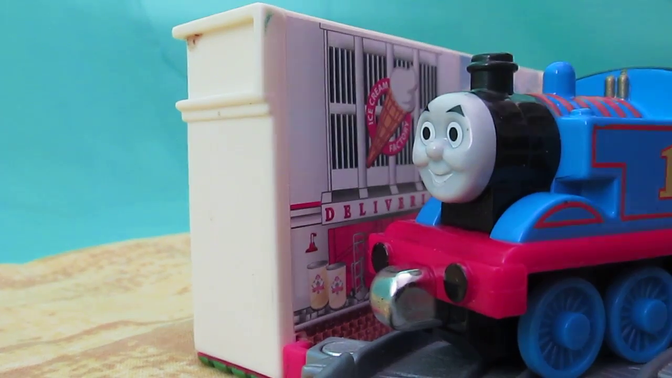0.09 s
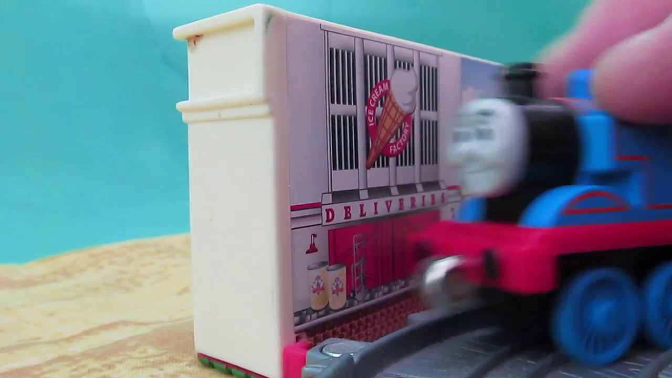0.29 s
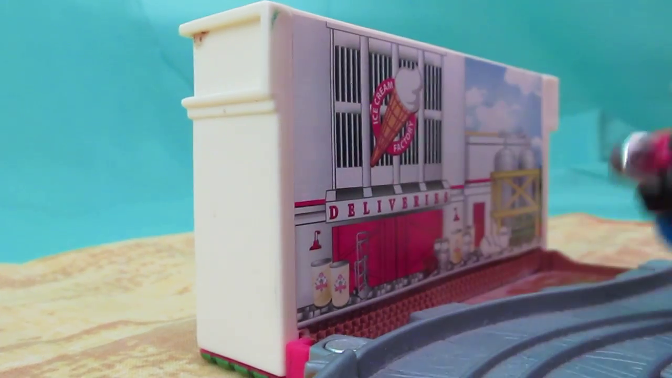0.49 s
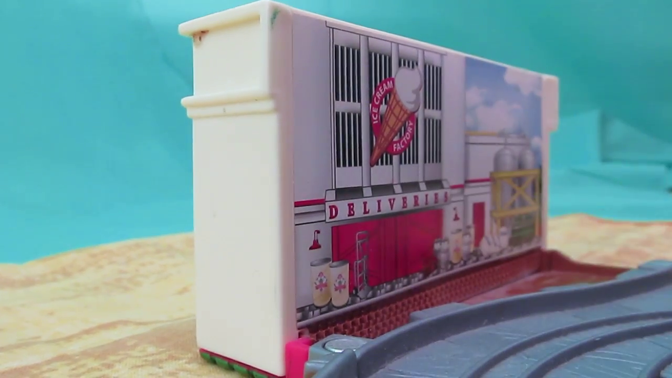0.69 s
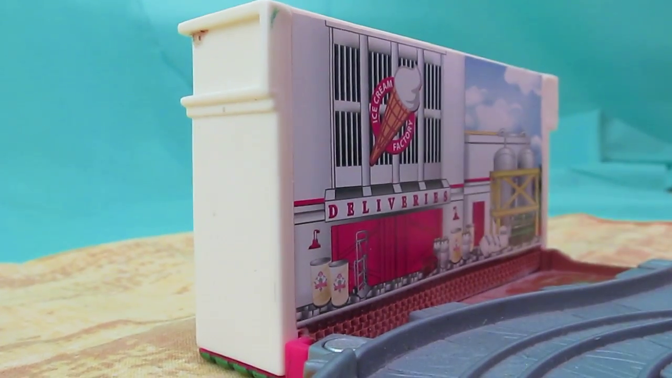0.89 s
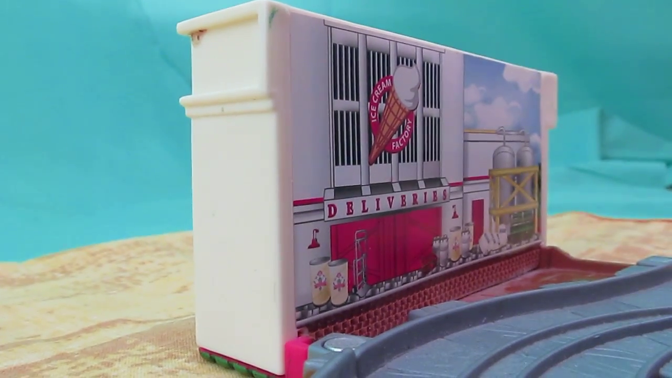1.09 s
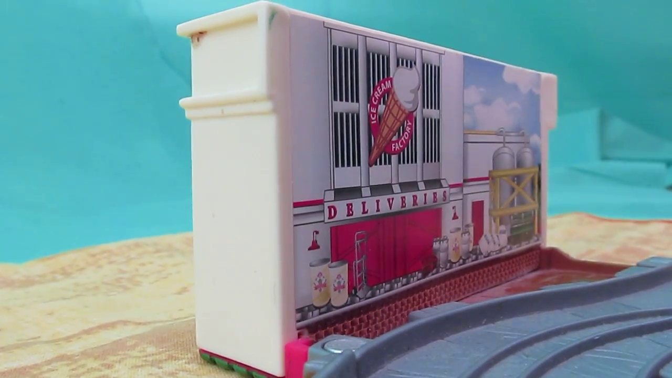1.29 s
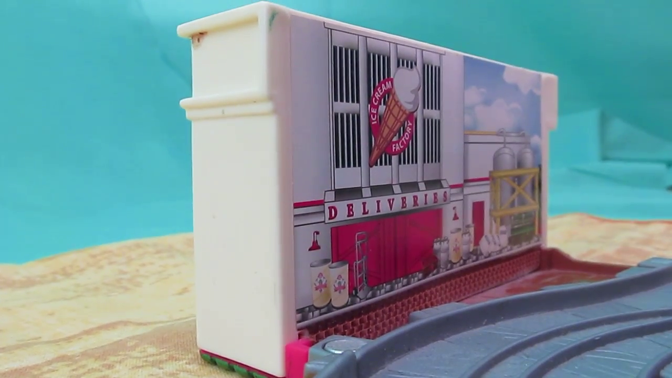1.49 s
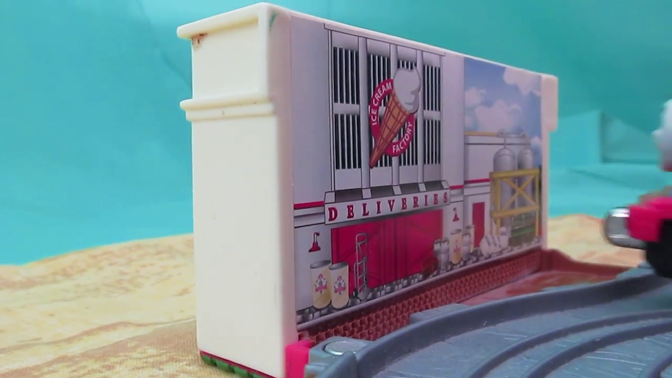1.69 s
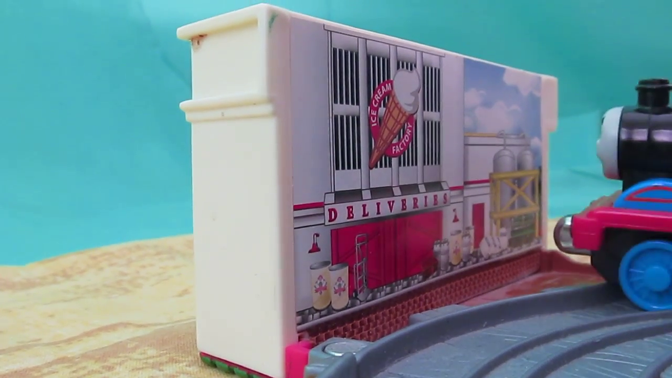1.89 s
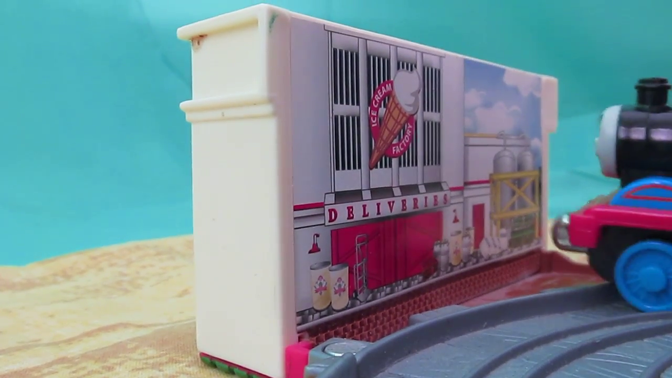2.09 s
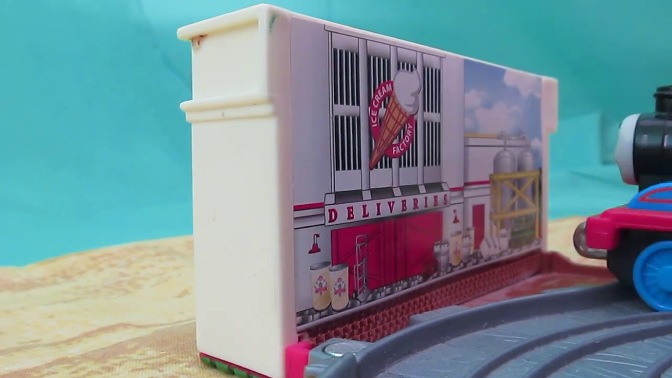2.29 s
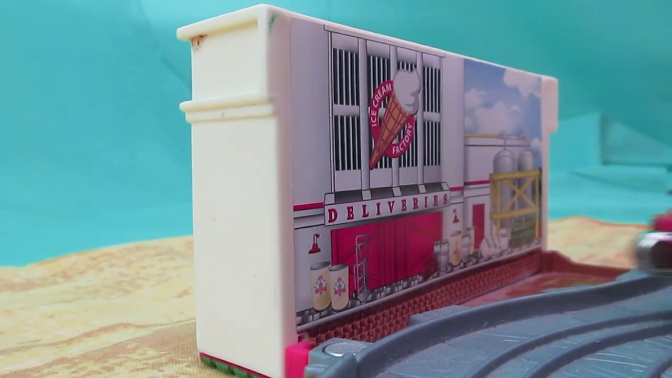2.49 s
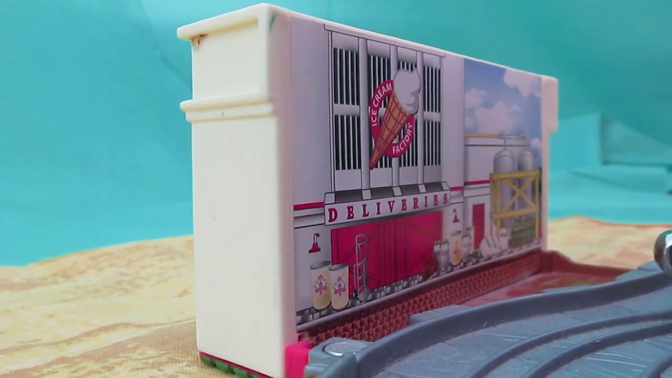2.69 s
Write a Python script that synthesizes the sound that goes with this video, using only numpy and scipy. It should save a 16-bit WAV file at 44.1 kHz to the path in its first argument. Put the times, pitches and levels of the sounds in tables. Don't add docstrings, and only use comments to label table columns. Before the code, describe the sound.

A small metal toy engine rattles on plastic track, close and right of centre. From 0.2 to 0.6 seconds it is jerked back with loud, dense clacks, metallic jingles and dull table thumps. Faint ticks fade into quiet room hum until about 1.5. A lighter clatter follows to 1.9, then brief shunting rattles near 2.15 and 2.45, and a last click at 2.7.

```python
import sys
import numpy as np
from scipy import signal
from scipy.io import wavfile

SR = 44100
rng = np.random.default_rng(int(sys.argv[2]) if len(sys.argv) > 2 else 0)


def linear_from_db(decibels):
    return 10 ** (np.asarray(decibels, float) / 20)


def generate_wav(sig):
    pcm = np.round(np.clip(np.atleast_2d(sig).T, -1, 1) * 32767).astype(np.int16)
    wavfile.write(sys.argv[1], SR, pcm)


N = 121275

# t/s, peak level/dB, shell pitch f/Hz
WHEEL_KNOCKS = [(0.2076, -21.5, 2460), (0.2453, -16, 3030), (0.2651, -27.5, 2850.0), (0.279, -22.5, 2680),
                (0.289, -30.0, 2310.0), (0.2926, -33.5, 2240), (0.3018, -25, 2400), (0.3101, -21.5, 2500.0),
                (0.3137, -14.5, 2560), (0.3237, -2.5, 2580), (0.328, -17.5, 2590.0), (0.3371, -16, 2630),
                (0.3419, -15.5, 2530), (0.3461, -22, 2590.0), (0.3496, -9.5, 2700.0),
                (0.3566, -17.5, 2710.0), (0.3618, -9.5, 2490), (0.3651, -20.0, 2600), (0.3699, -17, 2730),
                (0.3754, -14, 2650), (0.378, -1, 3340), (0.3822, -19, 2900), (0.3858, -20, 2580),
                (0.3886, -9, 2900), (0.3968, -18.5, 2730), (0.4063, -16.5, 2720.0), (0.4217, -23.0, 2560),
                (0.4328, -26.5, 2650), (0.4362, -33.5, 2580.0), (0.4412, -7.5, 2680), (0.5249, -24.0, 2170),
                (0.5299, -22.5, 2180), (0.5442, -16.5, 2110.0), (0.5658, -24.5, 1880), (0.569, -20.5, 2440),
                (0.573, -15, 2840), (0.5769, -8, 2430), (0.5803, -14.5, 1830), (0.5868, -9.0, 2900),
                (0.5902, -18, 2060), (0.6008, -12.5, 2710), (0.6092, -28.5, 2520), (0.6792, -44, 2200.0),
                (0.6971, -29.5, 1950), (0.8603, -37.5, 2580), (0.8603, -28.5, 2540), (0.8876, -48, 1765),
                (1.3016, -49.5, 1980), (1.3195, -47.5, 1700), (1.4503, -43.5, 1680), (1.473, -50, 1730),
               (1.4941, -40, 1870), (1.5168, -37, 1700), (1.529, -36.5, 1990), (1.5654, -17, 2900),
               (1.5701, -25, 2250), (1.5761, -9.5, 2970), (1.5906, -42, 2180), (1.6442, -40, 2200.0),
               (1.6724, -19.5, 1850), (1.6786, -14, 2290), (1.6807, -13, 2180), (1.6886, -20, 2700),
               (1.725, -22, 2070), (1.7414, -26.0, 2490.0), (1.7475, -31, 2390), (1.755, -45, 2040),
               (1.7622, -16.0, 2460), (1.765, -6.5, 2980), (1.7682, -6, 2730), (1.7787, -28, 2340),
               (1.7839, -22, 2065), (1.7862, -24.5, 2590), (1.794, -21, 2000), (1.812, -23.0, 2820),
               (1.8266, -22, 2366), (1.8298, -20.0, 2544), (1.8383, -17, 2150), (1.8445, -17, 1940.0),
               (1.8485, -23, 1940), (1.8519, -11.5, 2080), (1.867, -28, 2320.0), (1.8778, -19.0, 2280),
               (1.8824, -18, 2740), (1.8926, -26.5, 2154), (1.917, -36.5, 2560),
                (2.0611, -49, 1480), (2.1261, -29, 2160), (2.139, -30, 2400.0), (2.1434, -11.5, 2230),
                (2.1622, -36, 2280.0), (2.1748, -29, 2320.0), (2.1864, -18, 2620), (2.1893, -15, 2200),
                (2.195, -24, 2440), (2.2182, -43, 1890), (2.3265, -24, 2520.0), (2.3404, -49, 2400),
                (2.3718, -21, 1955), (2.3817, -19.5, 2240), (2.3944, -30.5, 2480.0), (2.4196, -34, 2060),
                (2.4282, -26, 2510), (2.435, -21.5, 2590.0), (2.4365, -26, 2540.0), (2.4415, -24, 2150),
                (2.4445, -24, 2580.0), (2.4502, -11.5, 2440), (2.459, -23, 2300), (2.4598, -16, 2490),
                (2.4623, -10.0, 2000), (2.4668, -6, 2710), (2.4741, -5, 3000), (2.486, -32, 2290.0),
                (2.494, -15.5, 2210), (2.5402, -27.5, 2460), (2.5457, -26, 2500), (2.5854, -44.5, 1570),
                (2.682, -49, 1840), (2.7022, -16.5, 2524), (2.7467, -33, 1780)]
# t/s, peak level/dB
METAL_JOLTS = [(0.2074, -35), (0.251, -48.5), (0.3178, -34), (0.3273, -25), (0.3339, -35), (0.3489, -37),
               (0.3617, -35), (0.3676, -27), (0.3783, -22.5), (0.3884, -26), (0.4056, -35.5), (0.4201, -30),
               (0.4245, -30.5), (0.4412, -22.5), (0.4524, -33), (0.4566, -22.5), (0.4827, -37.5),
               (0.529, -25.5), (0.5363, -24.5), (0.5413, -30.5), (0.5505, -23.5), (0.5699, -25),
               (0.5766, -16.5), (0.5869, -12), (0.5937, -28), (0.6003, -27.5), (0.6237, -37.5),
               (0.8645, -58),
               (1.44, -52), (1.566, -49), (1.5752, -28.5), (1.5912, -46), (1.6546, -52), (1.6807, -34),
              (1.6884, -34), (1.7261, -42), (1.729, -44), (1.7486, -63), (1.7701, -28), (1.7733, -28.5),
              (1.7805, -27), (1.7984, -34), (1.8433, -25), (1.85, -31.5), (1.8587, -31.5), (1.8654, -41),
              (1.8753, -38), (2.1457, -31.5), (2.1495, -38), (2.1893, -32), (2.199, -34.5), (2.3283, -57),
              (2.3821, -43), (2.419, -41), (2.4504, -26), (2.4602, -25), (2.4663, -38), (2.4719, -23.5),
              (2.4907, -38), (2.5017, -42), (2.5467, -41), (2.7046, -42)]
# t/s, peak level/dB, pitch f/Hz
TABLE_THUMPS = [(0.21, -31, 119), (0.2509, -27.5, 225), (0.3264, -34, 314), (0.3501, -31.5, 232),
                (0.3738, -35.5, 162), (0.4476, -33, 180), (0.5306, -32.5, 288), (0.5828, -30, 252),
                (1.594, -37.5, 291), (1.6882, -37.5, 325), (1.7306, -37.5, 275), (1.7816, -34, 337),
                (1.8522, -32.5, 162), (2.2054, -39.5, 229.5), (2.4594, -30.5, 116), (2.7089, -38, 264)]
# t/s, peak level/dB, pitch f/Hz
TRACK_KNOCKS = [(0.3127, -33, 443), (0.3367, -28, 660), (0.3779, -24.5, 1030), (0.4417, -25.5, 1005),
                (0.527, -31.5, 320), (0.5578, -27, 399), (0.588, -24, 372), (0.6958, -45.5, 470),
                (1.5725, -27, 520), (1.6852, -30, 344), (1.7252, -35.5, 334), (1.7842, -22.5, 362),
                (1.8558, -32, 369), (2.1469, -31, 658), (2.1927, -36, 483), (2.3279, -33.5, 373),
                (2.3768, -35.5, 410), (2.4515, -24.5, 1306), (2.6495, -41.5, 313), (2.703, -36, 397)]
# t/s, level/dB
ROLL_EFFORT = [(0, -56), (.2, -59.5), (.3, -28.5), (.45, -36.5), (.62, -54.5), (1.25, -79), (1.53, -57),
               (1.85, -32.5), (1.97, -80.5), (2.2, -38.5), (2.3, -67.5), (2.47, -34), (2.62, -61),
               (2.75, -57)]
# t/s, level/dB
RECORDER_GAIN = [(0, -46.5), (.3, -48.5), (.62, -59), (1.0, -61.5), (1.55, -48), (1.9, -53.5), (2.4, -49),
                 (2.75, -57)]
# f/Hz, density/(dB per Hz)
ROOM_SPECTRUM = [(25, -14), (70, 0.13), (140, -6), (260, -7), (550, -15), (1500, -25), (5000, -38),
                 (15600, -57)]
# f/Hz, likeness/(0-1)
LIKENESS = [(60, 0.79), (400, 0.81), (3000, 0.1), (15000, 0.23)]
# f/Hz, density/(dB per Hz)
ROLL_SPECTRUM = [(40, -10.5), (150, -5), (400, -4), (900, -22), (2900, -34.5), (4500, -22), (15000, -43.5)]
# f/Hz, level/dB
METAL_COLOUR = [(2800, -20.5), (4200, 9.5), (6300, 8), (8000, -7.5), (10000, -6.5), (15500, -26.5)]

LEFT_LAG_SAMPLES = 4
LEFT_DB, LEFT_TREBLE_DB, LEFT_BASS_DB = -2.2, -7.5, -4


def rms_one(x):
    return x / np.sqrt(np.mean(x ** 2) + 1e-20)


def in_time(rows):
    return np.interp(np.arange(N) / SR, *np.transpose(rows))


def at_hz(points, hz):
    f_hz, value = np.transpose(points)
    return np.interp(np.log(hz), np.log(f_hz), value)


def bandpass(x, low_hz, high_hz):
    return signal.sosfilt(signal.butter(2, [low_hz, high_hz], "band", fs=SR, output="sos"), x)


def drift(rate_hz):
    r = np.exp(-80 * np.pi * rate_hz / SR)
    slow = signal.lfilter([1], [1, -2 * r, r * r], rng.standard_normal(N // 40 + 2002))
    slow = rms_one(slow[2000:])
    return np.interp(np.arange(N) / 40, np.arange(len(slow)), slow)


def ring(clicks, hz, t60_s):
    r, w = linear_from_db(-60 / (t60_s * SR)), 2 * np.pi * hz / SR
    return signal.lfilter([0, np.sin(w)], [1, -2 * r * np.cos(w), r * r], clicks + 1e-18)


def add_burst(out, peak_s, hz, rise_cycles, gain, phase):
    rise_samples = rise_cycles * SR / hz
    u = np.arange(int(9 * rise_samples)) / rise_samples
    i = int((peak_s - rise_cycles / hz) * SR)
    envelope = (u * np.exp(1 - u)) ** 2
    burst = gain * envelope * np.sin(2 * np.pi * rise_cycles * u + phase)
    burst = burst[:N - i]
    out[i:i + len(burst)] += burst


def swell(rows, rise_s, fall_s):
    t, top = np.arange(N) / SR, np.full(N, -np.inf)
    for s, db, *_ in rows:
        slope = np.minimum((t - s) / rise_s, (s - t) / fall_s)
        top = np.maximum(top, np.log(linear_from_db(db)) + slope)
    return np.exp(top)


def grains(per_s, spread_db):
    hit = rng.random(N) < per_s / SR
    size = linear_from_db(spread_db * np.minimum(rng.exponential(1, N), 3.0))
    return hit * size * rng.choice([-1, 1], N)


def banded_noise(spectrum, patchy_db):
    out = 0
    edges_hz = 22 * 2 ** np.arange(0, 10, .5)
    white = rng.standard_normal((2, 2, N))
    for k, (low, high) in enumerate(zip(edges_hz, edges_hz[1:])):
        mid, side = bandpass(white[k % 2], low, high)
        hz = np.sqrt(low * high)
        alike = np.clip(at_hz(LIKENESS, hz), 0, 1)
        pair = np.sqrt(1 + alike) * mid + np.sqrt(1 - alike) * side * [[1], [-1]]
        out = out + linear_from_db(at_hz(spectrum, hz) + patchy_db * drift(23)) * pair
    return rms_one(out)


def room_tone():
    hum = linear_from_db(-2 + drift(6.2)) * np.sin(2 * np.pi * 120 * np.arange(N) / SR)
    return linear_from_db(in_time(RECORDER_GAIN)) * (banded_noise(ROOM_SPECTRUM, patchy_db=1.0) + hum)


def room_reflections(x):
    echo_db, echo_t60_s = -15.5, 0.043
    room_db, room_t60_s = -24.5, 0.29
    t = np.arange(SR // 2) / SR
    near = rng.standard_normal((2, len(t))) * linear_from_db(-60 * t / echo_t60_s) * (t > .0015)
    dull = signal.lfilter([1], [1, -.5], rng.standard_normal((2, len(t))))
    far = dull * linear_from_db(-60 * t / room_t60_s) * (t > .008)
    tail = linear_from_db(echo_db) * near / np.linalg.norm(near[0]) + linear_from_db(room_db) * far / np.linalg.norm(far[0])
    return signal.fftconvolve(x, tail, axes=1)[:, :N]


def rolling():
    noise = banded_noise(ROLL_SPECTRUM, patchy_db=5)
    return linear_from_db(in_time(ROLL_EFFORT)) * noise * linear_from_db([[LEFT_BASS_DB], [0]])


def thumps():
    table_rise_s, track_rise_s, thump_db = 0.00723, 0.00503, 1.5
    rumble_db, rumble_s = 6, 0.012
    deep, body = np.zeros(N), np.zeros(N)
    for out, rows, rise_s in ((deep, TABLE_THUMPS, table_rise_s), (body, TRACK_KNOCKS, track_rise_s)):
        for (s, db, hz), a in zip(rows, rng.random(len(rows))):
            add_burst(out, s, hz, rise_s * hz, linear_from_db(db + thump_db), 2 * np.pi * a)
    envelope = swell(TABLE_THUMPS + TRACK_KNOCKS, rumble_s / 2, rumble_s)
    rumble = envelope * linear_from_db(rumble_db) * rng.standard_normal((2, N))
    rumble = bandpass(rumble[0] + .5 * rumble, 120, 800)
    deep_left = np.roll(deep, 20 * LEFT_LAG_SAMPLES) * linear_from_db(2 * LEFT_BASS_DB)
    return (body + rumble) * linear_from_db([[LEFT_BASS_DB], [0]]) + [deep_left, 2 * deep]


def jingle():
    per_s, spread_db = 2500, 3.0
    rise_s, fall_s, jingle_db = .0012, .0035, 8
    snap_s, snap_db = .0004, 8.5
    axle_hz, axle_t60_s, axle_db = 6600, .08, -34
    jolts = METAL_JOLTS
    shake = swell(jolts, rise_s, fall_s) * linear_from_db(jingle_db)
    snap = swell(jolts, snap_s, snap_s) * linear_from_db(snap_db) * rng.standard_normal(N)
    broad = snap + shake * grains(per_s, spread_db)
    spray = np.zeros((2, N))
    edges_hz = np.geomspace(2400, 16000, 12)
    for low, high in zip(edges_hz, edges_hz[1:]):
        right = broad + shake * grains(per_s, spread_db)
        left_only = shake * grains(per_s, spread_db)
        left = (np.roll(right, LEFT_LAG_SAMPLES) + left_only) * linear_from_db(LEFT_TREBLE_DB)
        colour = linear_from_db(at_hz(METAL_COLOUR, np.sqrt(low * high)))
        spray += colour * bandpass([left, right], low, high)
    axle = ring(right, axle_hz, axle_t60_s) * linear_from_db(axle_db)
    return 2 * spray + [np.roll(axle, LEFT_LAG_SAMPLES) * linear_from_db(LEFT_TREBLE_DB), axle]


def wheel_chatter(rows):
    before_s, after_s, roll_db = .0012, .01, 12
    density = swell(rows, before_s, after_s) + linear_from_db(in_time(ROLL_EFFORT) + roll_db)
    hits = grains(900, 3.0) * density
    mode = rng.integers(0, 12, N)
    chatter = np.zeros(N)
    for k, hz in enumerate(np.geomspace(1900, 3600, 12)):
        chatter += ring(hits * (mode == k), hz, 9.0 / hz)
    return linear_from_db(-10.5) * bandpass(chatter, 1300, 4800)


def wheel_knocks():
    knock_db, side_mode_db = 0.5, -9
    crack_db, snap_s = -6, .0004
    rows, out = WHEEL_KNOCKS, np.zeros(N)
    for (s, db, hz), (a, b, c) in zip(rows, rng.random((len(rows), 3))):
        add_burst(out, s, hz, 1.9, linear_from_db(db + knock_db), 6 * a)
        add_burst(out, s, hz * (1.2 + .3 * b), 2, linear_from_db(db + side_mode_db), 6 * c)
        add_burst(out, s, hz * (.6 + .2 * c), 1, linear_from_db(db + side_mode_db), 6 * b)
    crack = swell(rows, snap_s, 2 * snap_s) * bandpass(rng.standard_normal(N), 900, 6000)
    mono = out + wheel_chatter(rows) + linear_from_db(crack_db) * crack
    return np.array([np.roll(mono, LEFT_LAG_SAMPLES - 1) * linear_from_db(LEFT_DB), mono])


def scene():
    toy = rolling() + thumps() + jingle() + wheel_knocks()
    return room_tone() + room_reflections(toy) + toy


def roll_off(x):
    return signal.sosfilt(signal.butter(12, 15760, fs=SR, output="sos"), x)


def record(dry):
    x = signal.sosfilt(signal.cheby2(10, 50, 16600, fs=SR, output="sos"), dry)
    x = signal.sosfilt(signal.butter(1, 30, "high", fs=SR, output="sos"), x)
    mix = np.clip(x, -1, 1)
    return roll_off(mix)


dry = scene()
out = record(dry)
generate_wav(out)
```